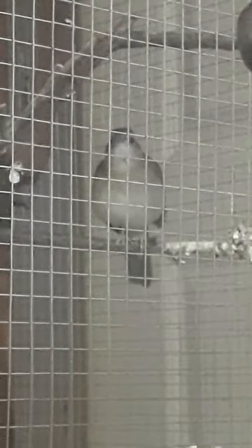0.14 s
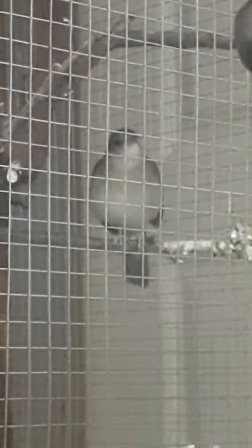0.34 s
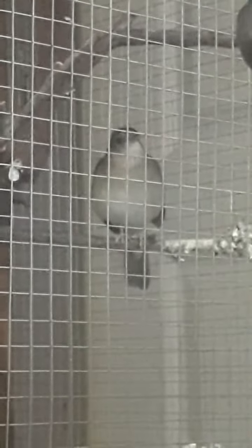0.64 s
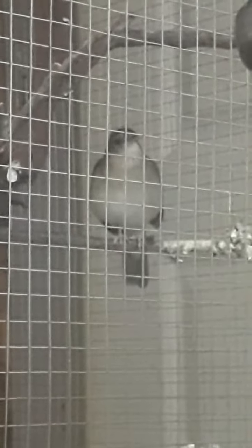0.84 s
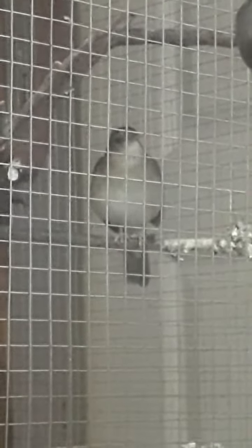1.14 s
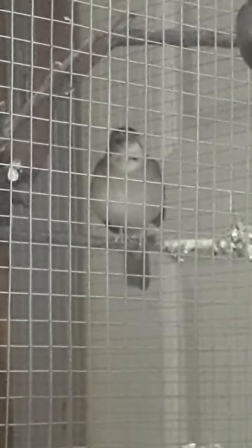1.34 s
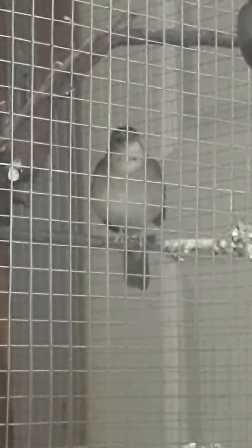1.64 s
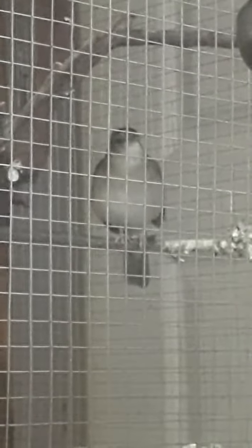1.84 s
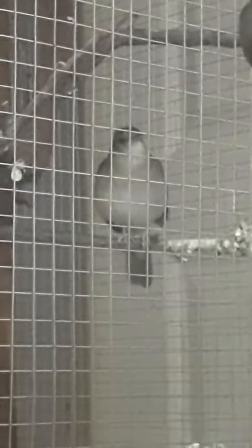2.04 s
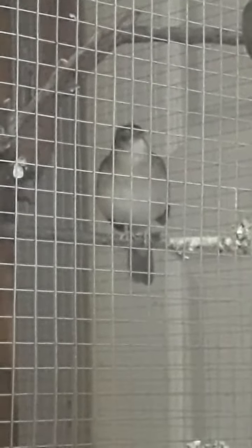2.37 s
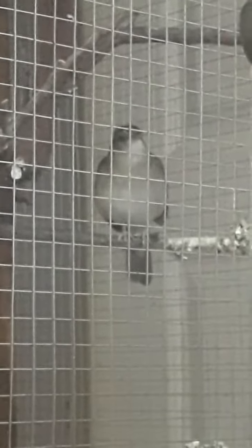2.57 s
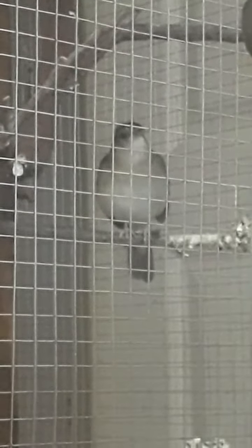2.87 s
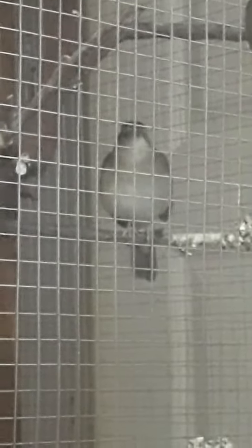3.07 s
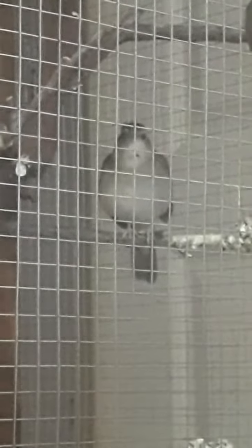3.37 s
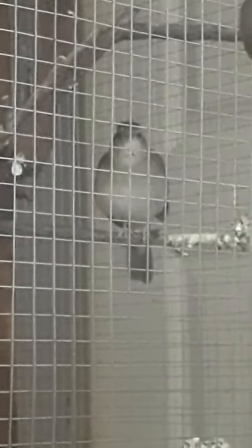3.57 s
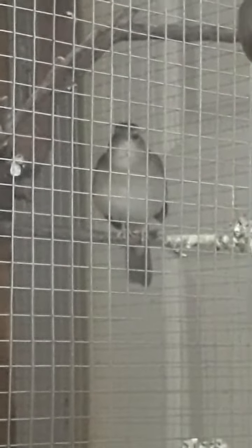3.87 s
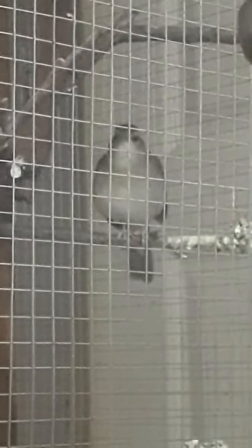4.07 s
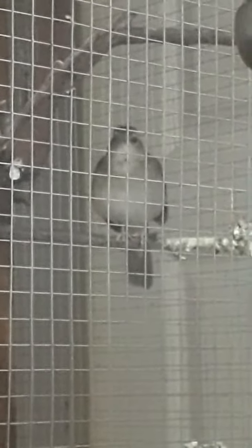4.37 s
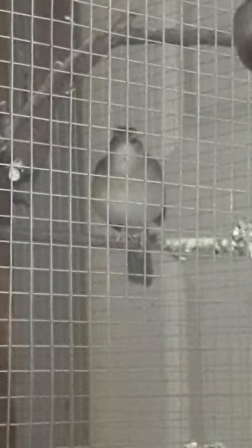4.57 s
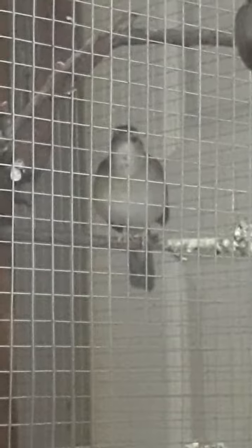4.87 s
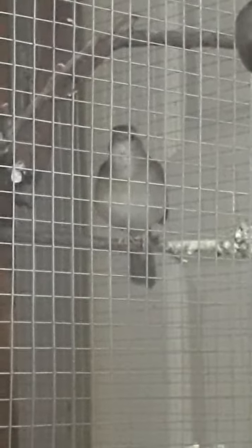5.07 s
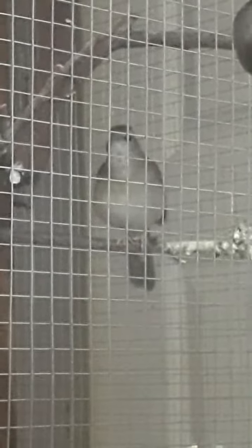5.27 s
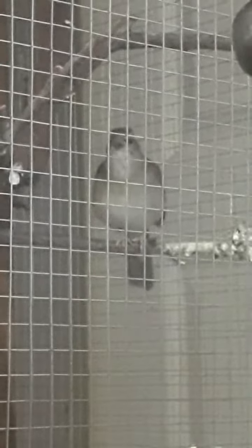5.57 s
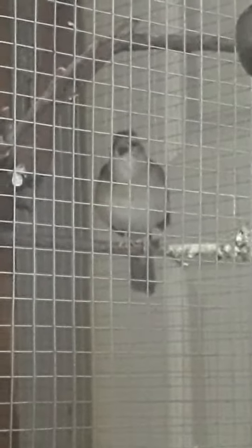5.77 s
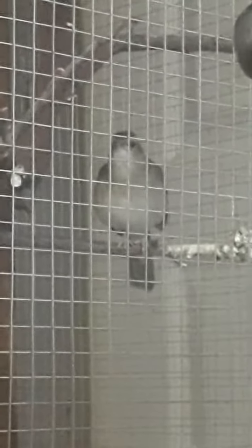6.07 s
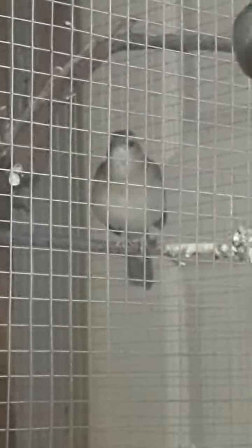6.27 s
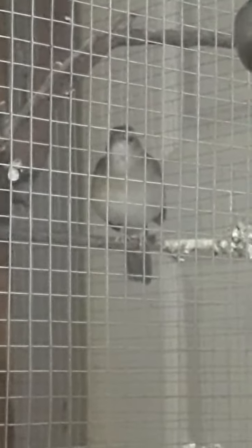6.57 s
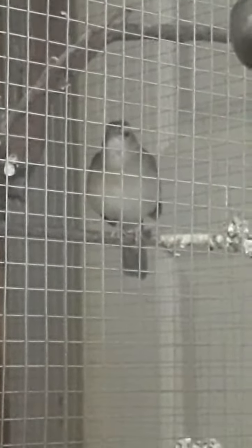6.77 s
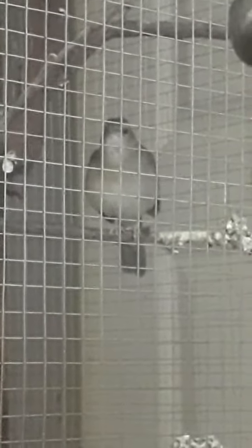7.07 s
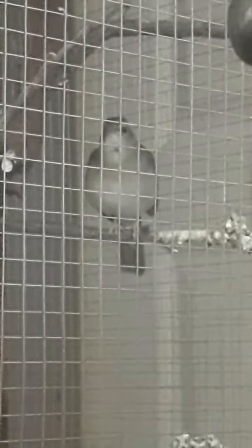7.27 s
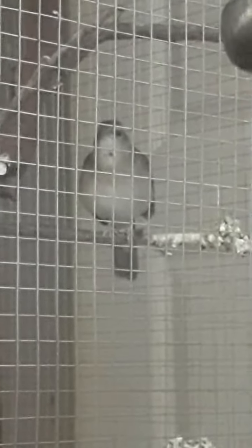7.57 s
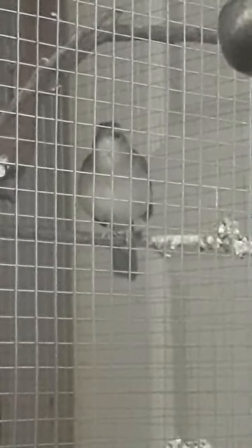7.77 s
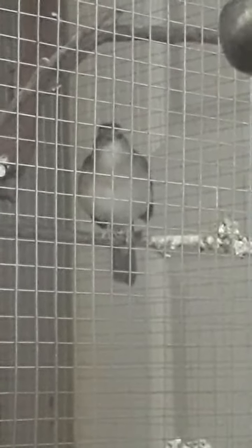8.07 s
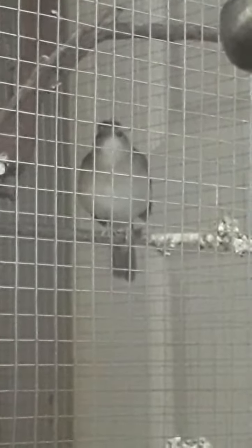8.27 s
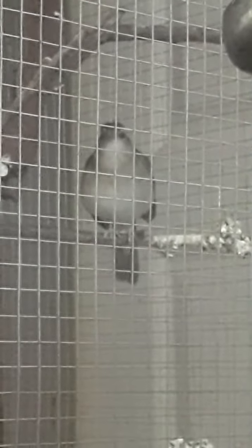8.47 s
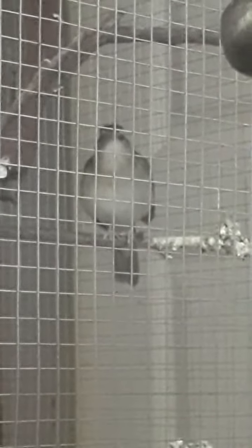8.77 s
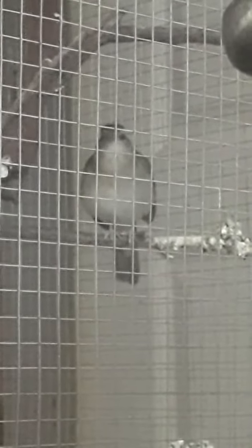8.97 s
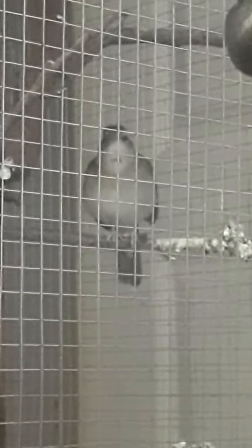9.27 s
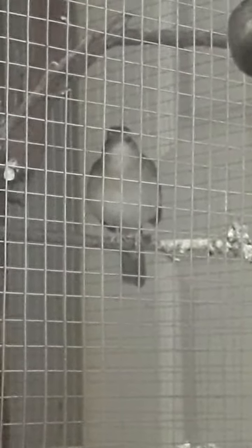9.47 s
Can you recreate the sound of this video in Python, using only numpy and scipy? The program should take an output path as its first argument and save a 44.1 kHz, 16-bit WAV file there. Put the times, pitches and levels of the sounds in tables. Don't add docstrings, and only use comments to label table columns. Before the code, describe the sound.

A small songbird on a perch in an indoor wire aviary sings in bursts. A sharp chirp opens, then faint peeps and chatter, low chucks and a short roll. A loud run of whistles and buzzes follows in the middle, then a rattle and rapid bending chirps. Other birds call faintly; claws and feathers scrape. Small hard-walled room, soft rumble, small microphone.

```python
import sys
import numpy as np
from scipy import signal
from scipy.fft import rfft, irfft
from scipy.io import wavfile
from scipy.ndimage import uniform_filter1d

SR = 44100
rng = np.random.default_rng(int(sys.argv[2]) if len(sys.argv) > 2 else 0)


def to_linear_factor(level_db):
    exponent = np.asarray(level_db, float) / 20
    return 10 ** exponent


def transcribe(u):
    v = np.clip(np.atleast_2d(u).T, -1, 1)
    q = np.round(v * 32767).astype(np.int16)
    wavfile.write(sys.argv[1], SR, q)


N = 424683

# [(length_share, glide_share, level_db), ..]
PIP = (-30.5, [(0, 0, -7), (.4, 0.46, -1), (1, 1, -6)])
# [(length_share, glide_share, level_db), ..]
HOOK = ((-19, -3.5, -4, 23.5), [(0, 0.021, -11), (.38, .78, 0), (1, 0.93, -15.5)])
# [(length_share, glide_share, level_db), ..]
HOLD = ((-33.5, 12), [(0, 0.073, -5), (.28, 0.83, 0.5), (1, 0.89, -7)])
# [(length_share, glide_share, level_db), ..]
DROP = (-29.5, [(0, 0, -7), (.45, .6, 0), (1, 0.98, -3)])
# [(length_share, glide_share, level_db), ..]
SWELL = (-27.5, [(0, 0.14, -4.5), (.5, 0.55, -2), (1, 0.99, -3)])
# [(length_share, glide_share, level_db), ..]
TICK = (-10, [(0, 0.032, -6), (.35, 0.77, -5), (1, 0.99, -2.5)])
# [(length_share, glide_share, level_db), ..]
FADE = (-27.5, [(0, 0, 0.5), (1, 1, -13.5)])
# [(length_share, glide_share, level_db), ..]
DRIFT = (-10.5, [(0, 0.039, -1.5), (.45, 0.45, 0), (1, 0.89, -3.5)])
# [(length_share, glide_share, level_db), ..]
ARCH = ((-27.5, -1, -9, 4.5), [(0, .33, -8), (.16, 0.69, -5), (.34, 0.76, 1.5), (.7, 0.99, -2),
        (.76, 0.69, 1.5), (.84, .2, 5.5), (.96, 0, -9.5)])
# [(length_share, glide_share, level_db), ..]
LEAD = ((-18, 0, 0, 7), [(0, 0, -10.5), (.6, .7, -3), (1, 1, 2)])

# start_s, length_s, from_hz, to_hz, level_db
PIPS = [(0.422, 0.038, 3960, 4370, -39), (0.486, 0.04, 2680, 2850, -53), (0.71, 0.031, 3330, 3060, -49.5),
        (1.003, 0.0348, 3930, 4280, -36.5), (1.59, 0.039, 3885, 4190, -37.5),
        (1.786, 0.052, 4700, 4790, -37.5), (2.0, 0.037, 2560, 2770, -48), (2.204, 0.046, 5935, 6190, -22),
        (4.157, .03, 5550, 5690, -47.5), (4.639, .06, 4700, 4870, -43.5), (4.661, .03, 2940, 3050, -36),
        (4.812, 0.092, 4900, 3580, -38), (5.257, 0.089, 3200, 3816, -28.5),
        (6.818, 0.028, 3830, 4770, -34.5)]
# start_s, length_s, from_hz, to_hz, level_db
HOOKS = [
    (1.088, 0.03, 2070, 3020, -33.5),
    (2.43, 0.0255, 2368, 2790, -38),
    (3.037, 0.037, 2223, 3100, -28.5),
    (3.144, .034, 2350, 3774, -22),
    (3.289, .033, 2352, 3766, -25),
    (9.26, .03, 2260, 2917, -30.5),
]
# start_s, length_s, from_hz, to_hz, level_db
HOLDS = [
    (0, 0.024, 6730, 8750, -20.5),
    (5.014, 0.08, 2305, 2373, -16),
    (5.192, 0.06, 2240, 2198, -13),
    (5.377, 0.06, 2301, 2166, -9),
    (5.527, .05, 3765, 3449, -7.5),
    (5.695, 0.06, 3114, 3440, -13),
    (5.872, 0.036, 3256, 3447, -15.5),
    (6.788, 0.024, 2364, 3394, -31),
]
# start_s, length_s, from_hz, to_hz, level_db
DROPS = [
    (4.968, .027, 2178, 1534, -16),
    (5.142, 0.028, 2190, 1550, -15),
    (5.331, .028, 1974, 1486, -13),
]
# start_s, length_s, from_hz, to_hz, level_db
SWELLS = [
    (2.155, .045, 3560, 4310, -37),
    (4.115, .085, 3060, 2800, -36.5),
    (4.632, .055, 3580, 3740, -33.5),
    (5.488, 0.033, 5010, 5410, -40.5),
    (5.517, .02, 3400, 4770, -17),
    (5.689, .022, 3707, 4505, -15),
    (5.86, .015, 4070, 4250, -15.5),
    (6.652, 0.018, 2100, 2850, -37.5),
    (7.581, .07, 4196, 6515, -38.5),
    (7.76, .07, 3690, 6570, -44),
]
# start_s, length_s, from_hz, to_hz, level_db
TICKS = [
    (9.111, 0.014, 2220, 1558, -25),
    (9.162, 0.012, 2340, 1466, -30.5),
    (9.218, 0.0138, 2325, 1374, -29),
    (9.272, 0.013, 2120, 1415, -27),
]
# start_s, length_s, from_hz, to_hz, level_db
FADES = [
    (0, 0.024, 5217, 5890, -12.5),
    (1.68, 0.075, 3940, 4890, -36),
    (4.17, 0.048, 5050, 5530, -41),
    (6.155, 0.053, 7390, 7200, -40.5),
    (6.22, 0.079, 5760, 5050, -42.5),
    (6.925, 0.027, 5150, 5055, -46.5),
]
# start_s, length_s, from_hz, to_hz, level_db
DRIFTS = [
    (.72, 0.069, 1600, 1200, -58.5),
    (4.88, 0.075, 1810, 1470, -46),
    (2.2, .055, 4490, 4900, -34.5),
    (1.901, 0.16, 1900, 1870, -65),
    (4.031, 0.11, 1340, 1810, -50.5),
    (4.25, 0.14, 2320, 1400, -44.5),
    (4.501, 0.21, 1230, 1700, -53.5),
    (9.3, .32, 1440, 2240, -53),
]
# start_s, length_s, from_hz, to_hz, level_db
ARCHES = [
    (.5, .3, 2922, 5190, -35),
    (1.09, .26, 2923, 5293, -36.5),
]
# start_s, length_s, from_hz, to_hz, level_db
LEADS = [
    (2.184, 0.02, 5550, 5950, -38),
    (3.276, 0.012, 1750, 2250, -46),
    (3.688, 0.013, 1900, 2400, -34),
    (3.731, .02, 2170, 2850, -38),
    (3.77, 0.021, 2262, 2880, -38),
    (3.812, .02, 2340, 2970, -39),
    (3.856, .022, 2405, 3010, -40),
    (8.308, .022, 1810, 2700, -38.5),
    (8.408, .018, 1900, 2610, -37),
    (8.682, 0.017, 1910, 3010, -41),
]
# [(time_s, pitch_hz, level_db), ..]
FLICKS = [
    ((-32, 0, -8.5, -4.5), [(8.325, 3296, -30), (8.335, 5780, -23.5), (8.339, 5710, -22.5), (8.343, 4560, -19.5), (8.352, 4200, -18), (8.365, 3650, -21)]),
    ((-33, -2, -9.5, -6), [(8.424, 3600, -20.5), (8.428, 4400, -17), (8.431, 4600, -20), (8.434, 5995, -21), (8.438, 4350, -18.5), (8.442, 3750, -21), (8.448, 4000, -18), (8.462, 3490, -17.5)]),
    ((-32, 0, -10, -4), [(8.696, 3518, -21), (8.701, 4800, -19.5), (8.706, 5806, -23), (8.71, 4660, -21), (8.714, 5510, -23), (8.719, 4018, -18.5), (8.741, 3634, -18.5)]),
]
# [(time_s, pitch_hz, level_db), ..]
FLOURISHES = [
    ((-37.5, -14), [(4.265, 3650, -39.5), (4.31, 3120, -32.5), (4.35, 2645, -23), (4.374, 2492, -18), (4.397, 2366, -27.5), (4.44, 2215, -32.5)]),
    ((-35, 12.5, -4, 7), [(4.689, 3300, -24), (4.708, 3300, -26), (4.718, 3800, -19), (4.735, 3150, -27), (4.765, 2842, -20.5), (4.81, 2483, -16.5), (4.83, 2425, -21.5), (4.84, 2410, -30.5), (4.89, 2290, -34)]),
    ((-31.5, -9, -12), [(7.914, 3010, -44), (7.925, 3120, -29), (7.942, 3045, -26), (7.963, 3003, -40.5), (7.974, 3084, -21.5), (8.0, 3868, -19.5), (8.022, 4270, -19), (8.056, 4630, -18), (8.082, 4450, -18.5)]),
    ((-25, 0.5, -11.5, 6), [(8.568, 2245, -53), (8.582, 3680, -26.5), (8.6, 4518, -17.5), (8.62, 3684, -17), (8.635, 3017, -33)]),
    ((-31.5, -10, -12, 4.5), [(8.887, 4286, -28.5), (8.915, 4157, -23.5), (8.928, 4260, -15), (8.941, 4190, -16.5), (8.958, 2770, -32.5)]),
    ((-35, -11.5, -16), [(8.968, 2864, -30), (8.982, 3260, -18), (9.01, 3567, -17), (9.031, 3480, -19), (9.043, 2250, -30.5)]),
    ((-18, 0, 0, 7), [(9.333, 5690, -59), (9.344, 6600, -42), (9.362, 6700, -31.5), (9.38, 7320, -27.5), (9.407, 5860, -15.5)]),
]

# start_s, length_s, start_hz, end_hz, level_db, depth_hz
BUZZES = [
    (5.571, .058, 5050, 5480, -10, 300),
    (5.746, .047, 4990, 5220, -11, 180),
    (5.905, 0.056, 5250, 5100, -13.5, 170),
    (4.28, 0.06, 3430, 2850, -26, 300),
    (4.71, .06, 3450, 2900, -21.5, 330),
]
# start_s, length_s, start_hz, end_hz, level_db, depth_hz
SHRIEK = (0, .035, 6900.5, 7000, -34, 1195.5)
WARBLE_PER_S = 125

# start_s, level_db, pulse_rate_hz
CHUCKS = [
    (2.755, -35.5, 527.3),
    (2.957, -36, 519),
    (3.126, -35.5, 512.4),
    (3.286, -35.5, 510.6),
    (3.425, -33.5, 510),
    (3.611, -34, 513.4),
]
# start_s, level_db, beak_hz
ROLL = [
    (3.664, -39.5, 1500),
    (3.7, -37.5, 1950),
    (3.744, -35, 1950),
    (3.785, -32.5, 2020),
    (3.824, -32.5, 2080),
    (3.874, -34.5, 2150),
]
# start_s, level_db
RATTLE = [
    (7.312, -39.5),
    (7.353, -37),
    (7.391, -36.5),
    (7.44, -34.5),
    (7.485, -31.5),
    (7.524, -31.5),
    (7.564, -31),
    (7.603, -32.5),
]
RATTLE_BEAK_HZ = 1950
# start_s, level_db, beak_hz
CHATTER = [
    (1.157, -44.5, 1720),
    (1.24, -43.5, 1852),
    (1.325, -42.5, 1850),
    (1.41, -43, 1725),
    (1.495, -46, 1710),
    (1.58, -46.5, 1600),
]
# start_s, level_db, pulse_rate_hz, length_s, beak_hz
WHEEZES = [
    (3.995, -41.5, 697, .16, 3970),
    (4.55, -41, 747, .14, 3820),
]
# start_s, level_db, pulse_rate_hz, length_s, beak_hz
SNAPS = [
    (.147, -38.5, 852, 0.03, 2110),
    (6.059, -28, 703, 0.014, 2780),
    (6.095, -34, 794, 0.017, 2340),
    (6.588, -42, 702, 0.0495, 3850),
    (8.412, -35.5, 792, 0.031, 2700),
]

# pulse_rate_hz, length_s, roughness_0_1, glide_share, breadth_octaves, rise_share, mouth_db
CHATTER_VOICE = (415, .088, 0.68, 0.07, 1.47, 0.12, -27)
# beak_hz, length_s, roughness_0_1, glide_share, breadth_octaves, rise_share, mouth_db
CHUCK_VOICE = (1792, .04, 0.22, -0.1, 0.8, .25, -21.5)
# pulse_rate_hz, length_s, roughness_0_1, glide_share, breadth_octaves, rise_share, mouth_db
ROLL_VOICE = (675.5, 0.031, 0.25, 0.03, 1, .25, -11.5)
# pulse_rate_hz, length_s, roughness_0_1, glide_share, breadth_octaves, rise_share, mouth_db
RATTLE_VOICE = (990, .022, 0.21, 0.15, 0.88, 0.22, -31)
# pulse_rate_hz, length_s, roughness_0_1, glide_share, breadth_octaves, rise_share, mouth_db
UNDERTONE_VOICE = (416.5, .026, 0.3, -0.4, 0.6, 0.7, -25)
UNDERTONE_DB = -11.5
# roughness_0_1, glide_share, breadth_octaves, rise_share, mouth_db
WHEEZE_TONE = (0.36, -0.35, 1.03, 0.35, -15)
# roughness_0_1, glide_share, breadth_octaves, rise_share, mouth_db
SNAP_TONE = (0.33, -0.43, 1.21, 0.11, -21)
# centre_hz, spread_octaves
MOUTH = (3880, 0.19)

# start_s, level_db, centre_hz, spread_octaves,
# length_s
HISSES = [(0.001, -47, 1490, 1.5, 0.013), (.438, -51, 3370, .075, .045), (1.016, -51, 3370, .11, .045),
          (1.101, -59, 3500, 0.17, .22), (1.62, -53, 4800, .12, .04), (1.672, -50.5, 3260, 0.093, 0.038),
          (2.098, -48, 3160, .08, 0.069), (2.661, -67, 4050, .04, 0.11), (2.851, -67, 3750, 0.053, 0.21),
          (3.501, -58, 3850, 0.056, .13), (3.735, -46, 2930, 0.21, 0.24), (4.17, -48, 4670, 0.27, 0.089),
          (5.129, -39.5, 4350, 0.34, 0.057), (5.201, -46.5, 5030, .13, 0.07),
          (5.697, -48.5, 1010, .15, .012), (6.148, -47, 6250, 0.24, 0.064),
          (6.401, -44.5, 4500, 0.37, 0.052), (4.705, -44, 6160, 0.17, 0.07),
          (4.285, -49.5, 6310, 0.15, 0.046), (8.326, -45, 8590, .14, 0.04),
          (8.417, -42.5, 8730, 0.15, 0.032), (8.69, -46, 8600, 0.13, 0.037), (0, -22.5, 7200, 0.16, 0.045),
          (0, -37, 13000, .4, 0.03), (6.601, -51, 230, .75, 0.17), (6.28, -58, 330, .6, 0.28),
          (6.905, -59.5, 6940, 0.046, 0.037), (7.361, -58, 3300, 0.33, .3), (7.841, -61.5, 5750, .2, .07),
          (8.121, -68.5, 6020, 0.01, .2), (9.085, -65.5, 6020, .01, .2)]
# [(start_s, level_db, length_s), ..]
PERCH = ((1200, 1.32), [(.615, -53, 0.035), (2.085, -54, 0.091), (3.435, -50, 0.12), (4.0, -51, 0.13),
         (4.66, -47.5, 0.046), (6.277, -46.5, .085), (6.45, -55.5, 0.41), (8.75, -51, 0.081)])
# [(start_s, level_db, length_s), ..]
WINGS = ((3000, 1.5), [(2.405, -51, 0.052), (2.528, -52.5, 0.034), (2.66, -62.5, 0.036),
         (7.76, -54.5, 0.09), (7.912, -47, 0.032)])
# [(start_s, level_db, length_s), ..]
WIRE = ((5300, 0.44), [(0, -34.5, 0.037), (2.845, -60, 0.036), (5.695, -39.5, 0.028), (6.06, -48, 0.012),
        (9.112, -53, .006), (9.163, -53, 0.0049), (9.22, -55, .006)])
# [(start_s, level_db, length_s), ..]
CLAWS = (.9, [(.64, -55, 0.013), (1.291, -60.5, .049), (1.42, -68.5, .08), (1.89, -63, .015),
         (3.435, -55.5, 0.059), (4.497, -59.5, .03), (6.278, -56.5, 0.042), (6.392, -59, 0.52),
         (6.539, -48.5, .011), (6.623, -43, 0.0099), (6.661, -40.5, .013), (6.704, -50, .011),
         (7.6, -55, .06), (9.268, -59, 0.014), (9.335, -67, .006), (9.492, -61, .006), (.613, -58, .005),
         (9.112, -55.5, .005), (9.163, -56.5, 0.0046), (9.219, -56.5, .005)])
CLAW_HZ = 11000
# [(start_s, level_db,
# length_s), ..]
LOW_BLURS = ((264, 0.49), [(5.578, -45, 0.055), (5.752, -49.5, .04), (5.925, -55, 0.03)])
# [(start_s, level_db,
# length_s), ..]
FLAPS = ((2750, 0.63), [(8.32, -39.5, .03), (8.686, -39.5, 0.029), (14, -40.5, 0.015), (7.486, -47, .005),
         (7.526, -44, .005), (6.1, -45.5, .005), (7.607, -48, .005), (6.66, -41, 0.029)])

# frequency_hz, t60_s
ROOM = [(400, .1), (900, 0.62), (1500, 0.45), (4000, 0.36), (7000, .22), (11000, 0.16)]
# time_s, level_db
STIR = [(0, -84), (1.1, -75.5), (2.1, -62), (3, -61.5), (4.2, -58), (5, -64.5), (6.3, -63), (6.9, -55.5),
        (7.1, -98), (7.699, -63), (8.8, -58.5), (9.63, -66.5)]
# frequency_hz, level_db
HUSH = [(30, -22), (50, -16), (65, -1.5), (130, 0), (300, -2.5), (600, -10), (1400, -8), (3500, -21),
        (7000, -20.5), (15500, -32), (16500, -60.5)]
HUSH_DB = -63.5
# centre_hz, width_hz, level_db
WHINE = (6050, 50, -81)
# start_s, end_s, pitch_hz, flutter_db, level_db
DRONE = (6.42, 7.3, 1421, 3.5, -63)
# centre_hz, spread_octaves, lift_db
CAPSULE = (15540, 0.43, 5.7)

HOARSE_DB_PER_S = 70
WAVER_PER_S = 0.05
OVERTONES_FOLLOW = 0.54
SWEEP_DULLS = 0.066
STROKE_S = 0.045
STROKE_ECHO_DB = 1.5
FAR_DIRECT_DB = -8
OVERLOAD = 1.0


def evened(x):
    return x / np.sqrt(np.mean(x ** 2) + 1e-20)


def read(points, hz):
    f, value = np.transpose(points)
    return np.interp(np.log(hz + 1), np.log(f + 1), value)


def add(mix, s, sound):
    part = mix[round(s * SR):][:len(sound)]
    part += sound[:len(part)]


def wander(luck, n, size):
    smooth = uniform_filter1d(uniform_filter1d(luck, size), size)
    return evened(smooth)[:n]


def coloured(luck, gain):
    hz = np.fft.rfftfreq(len(luck), 1 / SR)
    return evened(irfft(rfft(luck) * gain(hz), len(luck)))


def bell(hz, octaves):
    return lambda f: np.exp(-0.5 * (np.log2((f + 20) / hz) / octaves) ** 2)


def edges(t, rise, fall):
    ramp = np.clip(np.minimum(t / rise, (t[-1] - t) / fall), 0, 1)
    return np.sin(np.pi / 2 * ramp) ** 2


def syrinx(luck, hz, overtone_db, effort_db=0):
    n = len(hz)
    first_db, fifth_db, fourth_db, onset_db = np.append(overtone_db, np.zeros(3))[:4]
    waver = 0.004 + WAVER_PER_S * np.clip(n / SR - 0.08, 0, 0.25)
    turns = np.cumsum(hz * (1 + waver * wander(luck[0], n, size=40))) / SR
    step_db = 4.0 - hz / 400 - 0.59 * max(first_db + 33.0, 0)
    sweep_db = np.minimum(SWEEP_DULLS * abs(np.gradient(hz)) * SR / 1000, 9)
    dull_db = onset_db * np.linspace(1, -1, n) + OVERTONES_FOLLOW * effort_db - sweep_db
    upper = np.zeros(n)
    for k in range(7):
        partial = k + 2
        partial_db = first_db + dull_db + step_db * k + fifth_db * (k == 3) + fourth_db * (k == 2)
        audible = partial * hz < SR / 2.5
        upper += to_linear_factor(partial_db) * np.sin(2 * np.pi * partial * turns) * audible
    upper = upper * to_linear_factor(3.5 * wander(luck[1][::-1], n, size=60))
    breath = to_linear_factor(min(HOARSE_DB_PER_S * n / SR - 35.0, -9)) * wander(luck[0][::-1], n, size=40)
    voice = (1 + breath) * np.sin(2 * np.pi * turns) + upper
    return np.sqrt(2) * voice * to_linear_factor(3.2 * wander(luck[1], n, size=150))


def whistle(luck, overtone_db, rows):
    s, hz, db = np.transpose(rows)
    t = np.arange(s[0], s[-1], 1 / SR)
    rounding = np.clip(len(t) // (3 * len(s)), 70, 500)
    glide = uniform_filter1d(np.interp(t, s, hz), size=rounding, mode="nearest")
    voice = syrinx(luck, glide, overtone_db, np.interp(t, s, db - db.max()))
    return s[0], voice * to_linear_factor(np.interp(t, s, db) - 1.58) * edges(t - s[0], 0.0019, 0.0042)


def stretched(kinds):
    notes = []
    for (overtone_db, shape), rows in kinds:
        for s, length, a, b, db in rows:
            points = [(s + at * length, a + glide * (b - a), db + rel) for at, glide, rel in shape]
            notes.append((overtone_db, points))
    return notes


def whistles():
    kinds = ((PIP, PIPS), (HOOK, HOOKS), (HOLD, HOLDS), (DROP, DROPS), (SWELL, SWELLS), (TICK, TICKS),
             (FADE, FADES), (DRIFT, DRIFTS), (ARCH, ARCHES))
    return FLOURISHES + stretched(kinds) + FLICKS


def buzz(luck, s, length, start_hz, end_hz, db, depth_hz):
    t = np.arange(0, length, 1 / SR)
    n = len(t)
    swing = np.sin(2 * np.pi * WARBLE_PER_S * t + 0.6 * wander(luck[0], n, size=300))
    swing = swing * to_linear_factor(2.2 * wander(luck[1], n, size=300))
    pitch = start_hz + (end_hz - start_hz) * t / length + depth_hz * swing
    return s, syrinx(luck, pitch, -30.5) * to_linear_factor(db) * edges(t, 0.0039, 0.014)


def chuck(luck, s, db, hz, length, beak_hz, rough, glide, breadth, rise, mouth_db):
    t = np.arange(0, length, 1 / SR)
    rough = np.clip(rough, 0, 1)
    arch = 0.96 + 0.1 * np.sin(np.pi * t / length) + glide * (t / length - 0.5)
    pitch = hz * (arch + 0.16 * rough * wander(luck[0], len(t), size=60))
    turns = np.cumsum(pitch) / SR
    k = np.arange(1, 15)[:, None]
    octaves = np.log2(k * pitch / beak_hz)
    above = octaves > 0
    hump_db = np.where(above, -30, -55 * (550 / hz) ** 2) * (octaves / breadth) ** 2
    skirt_db = np.where(above, -6 - 19 * octaves, -70)
    throat = to_linear_factor(np.maximum(hump_db, skirt_db))
    mouth = to_linear_factor(mouth_db) * bell(*MOUTH)(k * pitch)
    voice = ((throat + mouth) * np.cos(2 * np.pi * k * (turns + 0.07 * k))).sum(0)
    rasp = coloured(luck[1], bell(beak_hz, 0.51))[:len(t)]
    effort = to_linear_factor(db + 4.0 * rough * wander(luck[1], len(t), size=50)) * edges(t, rise * length, 0.63 * length)
    return s, effort * (evened(voice) + 1.37 * rough * rasp)


def strokes():
    rattle = [(*row, RATTLE_BEAK_HZ) for row in RATTLE]
    undertone = [(s, db + UNDERTONE_DB, 0.98 * hz) for s, db, hz in rattle]
    voiced = ((CHATTER_VOICE, CHATTER), (ROLL_VOICE, ROLL), (RATTLE_VOICE, rattle), (UNDERTONE_VOICE, undertone))
    notes = []
    for (hz, length, *tone), rows in voiced:
        notes += [(s, db, hz, length, beak_hz, *tone) for s, db, beak_hz in rows]
    beak_hz, length, *tone = CHUCK_VOICE
    notes += [(s, db, hz, length, beak_hz, *tone) for s, db, hz in CHUCKS]
    notes += [(*row, *WHEEZE_TONE) for row in WHEEZES]
    return notes + [(*row, *SNAP_TONE) for row in SNAPS]


def rustle(luck, s, db, hz, octaves, length):
    t = np.arange(0, length, 1 / SR)
    rise = 0.0015 + 0.08 * length

    def colour(f):
        return bell(hz, octaves)(f) / np.hypot(1, (f / 17000) ** 2)

    hiss = coloured(luck[0], colour)[:len(t)]
    level_db = db + 4.5 * wander(luck[1], len(t), size=70) - 7 * t / length
    return s, to_linear_factor(level_db) * hiss * edges(t, rise, 0.45 * length)


def scrapes():
    kinds = (PERCH, WINGS, WIRE, ((CLAW_HZ, CLAWS[0]), CLAWS[1]), LOW_BLURS, FLAPS)
    contacts = [(s, db, *colour, length) for colour, rows in kinds for s, db, length in rows]
    return HISSES + contacts


def room():
    taps = np.zeros(SR // 2)
    at = np.arange(130, len(taps) - 20, 20)
    taps[at + rng.integers(0, 20, len(at))] = rng.choice([-1., 1.], len(at))
    taps *= 1 + 2.1 * np.exp(-np.arange(len(taps)) / (0.017 * SR))
    hz, t, z = signal.stft(taps, SR, nperseg=128)
    decay = to_linear_factor(-60 * t / read(ROOM, hz)[:, None])
    tail = signal.istft(z * decay, SR, nperseg=128)[1]
    return tail / np.linalg.norm(tail)


def whine(luck, level_luck):
    hz, width, db = WHINE
    tone = coloured(luck, lambda f: np.exp(-0.5 * ((f - hz) / width) ** 2))
    return tone * to_linear_factor(db + 3 * wander(level_luck, N, size=4000))


def drone(luck):
    start, end, hz, flutter_db, db = DRONE
    t = np.arange(N) / SR
    level = to_linear_factor(db + flutter_db * wander(luck, N, size=900) - 5 * (t - start))
    fade = np.clip(np.minimum(t - start, end - t) / 0.125, 0, 1)
    return level * np.sin(2 * np.pi * hz * t) * fade


def stir(level_luck, luck):
    level_db = np.interp(np.arange(N) / SR, *np.transpose(STIR)) + 2.5 * wander(level_luck, N, size=1500)
    return to_linear_factor(level_db) * coloured(luck, bell(1500, 1.246))


def hush():
    luck = rng.standard_normal((5, N))
    air = to_linear_factor(HUSH_DB) * coloured(luck[4], lambda f: to_linear_factor(read(HUSH, f)))
    return air + stir(luck[2], luck[3]) + whine(luck[0], luck[1]) + drone(luck[0])


def scene(count=3):
    floor = hush()
    paths = np.array([room() for _ in range(count)])
    direct, echoed = np.zeros(N), np.zeros((count, N))
    sources = ((whistle, whistles()), (buzz, [SHRIEK] + BUZZES), (chuck, strokes()), (rustle, scrapes()),
               (whistle, stretched([(LEAD, LEADS)])))
    for make, table in sources:
        pulsed = make is chuck
        for k, row in enumerate(table):
            s, sound = make(rng.standard_normal(size=(2, 36000)), *row)
            near_stroke = pulsed and len(sound) < STROKE_S * SR
            far = abs(sound).max() < to_linear_factor(-28) and not near_stroke
            add(direct, s, sound * to_linear_factor(FAR_DIRECT_DB * far))
            add(echoed[k % count], s, sound * to_linear_factor(-5.0 + 3.68 * far + STROKE_ECHO_DB * pulsed))
    ringing = signal.fftconvolve(echoed, paths, axes=1).sum(0)[:N]
    return (direct + ringing + floor)[None]


def top_cut(x):
    return signal.sosfilt(signal.butter(12, 15850, fs=SR, output="sos"), x)


def record(dry):
    hz, octaves, db = CAPSULE
    lift = to_linear_factor(db * bell(hz, octaves)(np.fft.rfftfreq(N, 1 / SR)))
    lifted = irfft(rfft(dry) * lift, N)
    return top_cut(np.tanh(lifted * OVERLOAD) / OVERLOAD)


dry = scene()
out = record(dry)
transcribe(out)
```